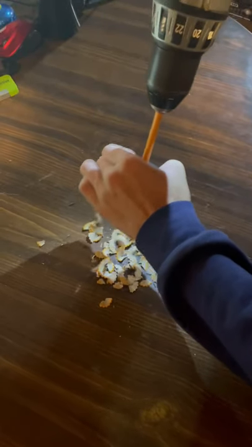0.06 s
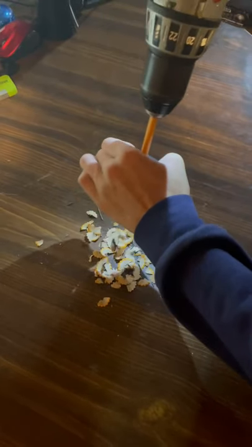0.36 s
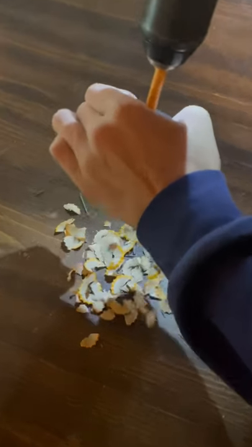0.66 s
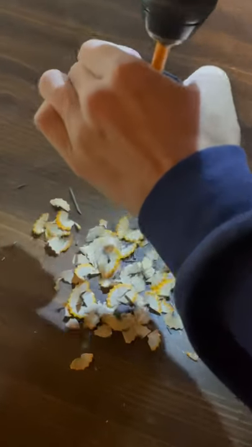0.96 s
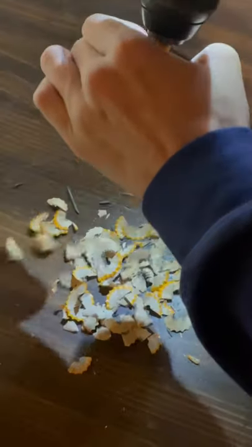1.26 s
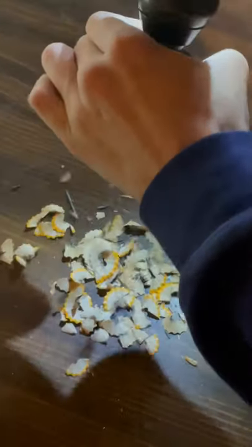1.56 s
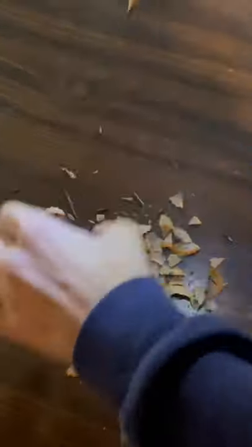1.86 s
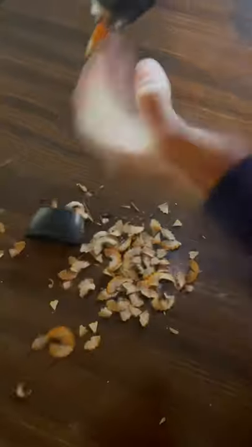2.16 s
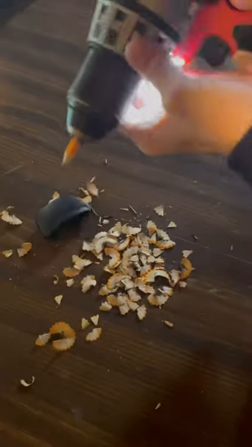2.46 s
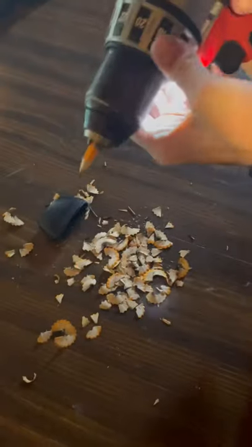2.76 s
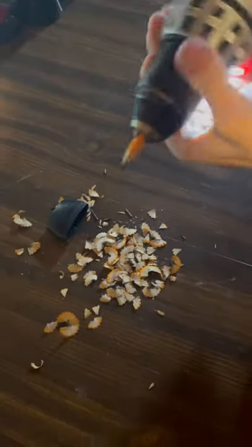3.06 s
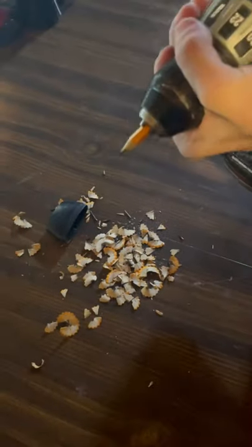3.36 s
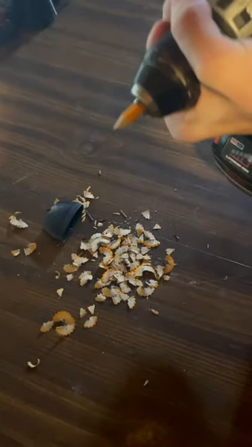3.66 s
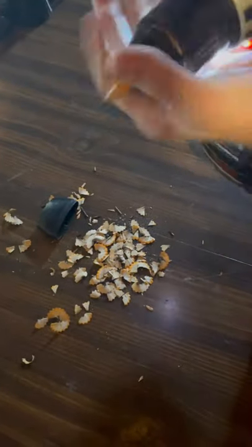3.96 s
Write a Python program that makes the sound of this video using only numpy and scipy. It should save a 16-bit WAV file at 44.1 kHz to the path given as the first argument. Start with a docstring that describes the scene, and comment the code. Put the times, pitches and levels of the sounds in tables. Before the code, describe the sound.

A cordless drill grinds a pencil in a sharpener, which then clatters onto a wooden table.

```python
"""A cordless drill whines close by, spinning a pencil in a hand-held sharpener over a wooden table.
The blade rasps, chatters and cracks through the wood. The drill stops, and the plastic sharpener
clatters down, each bounce a tap and a short ring. The drill clacks as it is handled, then two blips
of the trigger spin it freely. A low room hum lies under it all, and a deep rumble swells at the end."""
import sys
import numpy as np
from scipy import signal
from scipy.fft import rfft, irfft, next_fast_len
from scipy.io import wavfile
from scipy.ndimage import uniform_filter1d

SR = 44100
rng = np.random.default_rng(int(sys.argv[2]) if len(sys.argv) > 2 else 0)


def master(y):
    """Save y as 16-bit WAV."""
    cut = np.clip(np.atleast_2d(y).T, -1, 1)
    pcm = np.round(cut * 32767)  # scale
    wavfile.write(sys.argv[1], SR, pcm.astype(np.int16))


N = 176400
TIME = np.arange(N) / SR
BINS = np.fft.rfftfreq(N, 1 / SR)

# trigger pulls (press [s], release [s], spin-up [s], coast [s], top motor speed [Hz], drive [dB])
TRIGGER_PULLS = [(-.5, 1.48, .1, .1, 304.5, 0), (3.278, 3.386, .09, 0.092, 332.7, -4.5),
                 (3.518, 3.6267, .115, .13, 313.3, -1.5)]
# motor and gear tones (multiple of motor speed, level under load [dB], level spinning free [dB])
MOTOR_TONES = [(1, -44, -62), (2, -58, -72), (3, -62, -70), (4, -54, -45), (5, -62, -52), (6, -55, -60),
               (6.88, -51, -60), (8, -60, -48), (9.48, -44.5, -54), (10, -40, -44), (11, -48, -54),
               (12, -47.5, -39), (15, -39, -37), (16, -52, -35.5), (16.58, -47, -46), (18, -44.5, -45),
               (18.98, -44.5, -45), (19.95, -48, -42), (21, -47, -47)]
# rattle of brushes and gears (frequency [Hz], gain [dB])
RATTLE_EQ = [(100, -28.5), (250, -18.5), (600, -8), (1000, -11.5), (1300, -4), (1950, -8), (2350, 2),
             (3000, -0.5), (3700, 3.5), (4200, 2.5), (4900, 5), (6300, 3), (8000, -5), (10700, 0.5),
             (13000, -12), (15500, -15), (16500, -36.5)]

# pressure of the pencil on the blade (time [s], relative level [dB])
BLADE_PRESSURE = [(0, -13), (.35, -10), (.54, -2), (.8, -3), (.97, 0), (1.2, 0), (1.34, 1), (1.45, -4),
                  (1.5, -4.5), (1.56, -26.5), (1.65, -75)]
# rasp of the blade (frequency [Hz], gain [dB])
RASP_EQ = [(150, -25), (400, -10), (1000, -10), (1600, -7.5), (2000, 1), (2400, -12.5), (3000, -3),
           (3350, -4), (3700, 4), (4300, -2), (4800, 1.5), (5600, 0), (7000, -2.5), (10000, -11),
           (15500, -17.5), (16500, -37.5)]
# low grind of the blade (time [s], level [dB])
GRIND_FADER = [(.45, -43.5), (.56, -39.5), (.85, -39.5), (1.05, -39.5), (1.35, -39), (1.5, -41.5),
               (1.56, -86)]
# shrill chatter as the blade bites deep (time [s], level [dB])
CHATTER_FADER = [(.45, -54.5), (.6, -37), (.88, -40), (.96, -33.5), (1.05, -37), (1.35, -36.5),
                 (1.48, -44.5), (1.56, -87)]
# pencil rubbing in the cone (time [s], level [dB])
RUB_FADER = [(0, -27.5), (.4, -29.5), (.7, -31.5), (1.15, -32.5), (1.42, -33.5), (1.5, -31.5), (1.6, -71),
             (1.65, -104)]
# hiss of that rubbing (frequency [Hz], gain [dB])
RUB_EQ = [(200, -13.5), (700, -6), (1800, -6), (4000, -11), (5500, 3.5), (7000, 1.5), (8500, -4.5),
          (10500, -0.5), (13000, -4), (15500, -10.5), (16300, -40.5)]
# pencil cracking (time [s], level [dB], tilt [dB/octave], contact decay [s], focus [Hz])
PENCIL_CRACKS = [(.4065, -23, 0, .0012, 4000), (.458, -26, 1, .001, 10000), (.511, -27, 0, .0006, 6000),
                 (.557, -25, 0, .0012, 2100), (.597, -24, 1, .001, 9000), (.878, -24, 1, .002, 10000),
                 (1.034, -25, 1, .0015, 11000), (1.164, -24, 1, .001, 10000), (1.276, -25, 1, .0015, 10000),
                 (1.2858, -22, 0, .0012, 5000), (1.3172, -16.5, 0, .0013, 3000)]
# snap of the wood (frequency [Hz], gain [dB])
CRACK_EQ = [(300, -25), (1500, -11.5), (2000, 5.5), (3000, -5.5), (7000, 6), (11000, 5.5), (15500, -10.5),
            (16500, -27.5)]

# sharpener bouncing on the table
# (time [s], relative level [dB], tilt [dB/octave], contact decay [s], focus [Hz], landing [0 flat, 1 edge])
SHARPENER_BOUNCES = [(1.946, -52, 3, 0.0044, 4500, 0.29), (1.954, -23.5, 1, 0.0044, 4540, 0.7),
                     (1.959, -23.5, -3.5, 0.0012, 1300, 1), (2.014, -28, -3, 0.0045, 2800, 0.14),
                     (2.059, -20, -1.5, 0.0059, 2870, 0.37), (2.095, -21, 3.5, 0.0019, 4700, 0),
                     (2.139, -19, 2, 0.0013, 3630, 0.42), (2.1507, -19.5, -0.5, 0.0013, 2570, .5),
                     (2.154, -20.5, 1, 0.0018, 1330, 0.4), (2.1822, -23, 1.5, 0.0023, 5770, .7),
                     (2.2144, -24, 0.5, 0.00087, 3530, 0.45), (2.237, -30, -3, 0.0051, 3500, .5),
                     (2.253, -33.5, -4, 0.0039, 3500, 0.57), (2.261, -31.5, -4.5, 0.0046, 5560, 1),
                     (2.285, -31, 3.5, 0.0014, 1870, 1)]
# ring of sharpener and table
# (frequency [Hz], relative level [dB], t60 [s], edge-landing gain [dB], left lead [turns])
SHELL_MODES = [(379, -10, .07, 5, 0), (629.54, -11.5, 0.24, -4, 0.17), (876, -2, 0.15, -1.5, 0.074),
               (1040, -1.5, 0.13, -7, 0.13), (1143, -5.5, 0.072, 8.5, 0.16), (1299, -1.5, 0.17, -16, .15),
               (1844, -6, 0.1, 17, 0.066), (2160, -7, 0.041, 2, 0.14), (2440, -18, 0.13, 4, 0),
               (2740, 0, 0.061, -19, 0.075), (3550, -3, 0.019, -5.5, 0.038), (4580, -10, 0.065, 6, 0),
               (5690, -10, 0.04, 7, 0.065), (6500, -1, 0.029, -1, 0), (6900, -22, 0.034, -3, 0),
               (9650, -8.5, 0.018, 1, 0)]
# tap on the table top (frequency [Hz], gain [dB])
TAP_EQ = [(40, -57), (150, -2), (400, -8), (1100, 1), (2400, -3.5), (3500, -4), (4200, -10), (6000, -6),
          (7200, -13.5), (9000, -2.5), (12000, -27), (15500, -16.5), (16500, -35.5)]

# switch, trigger and gearbox
# (time [s], relative level [dB], tilt [dB/octave], contact decay [s], focus [Hz])
DRILL_CLACKS = [(1.6205, -50, 3.5, .002, 4770), (2.455, -43.5, -1, 0.0048, 4170),
                (2.573, -50, -1, 0.0028, 3320), (2.6845, -25, 1, 0.0041, 4800),
                (2.687, -30, -1.5, 0.0067, 393), (3.246, -47, -8, 0.0025, 4530),
                (3.2605, -45.5, 5.5, 0.0029, 4770), (3.292, -47.5, 4, .003, 4700),
                (3.3503, -16, 2.5, 0.0044, 2940), (3.355, -27, -10.5, 0.0028, 650),
                (3.922, -48.5, -4.5, 0.0037, 2100), (3.95, -46, -6.5, 0.0096, 2295),
                (3.975, -49, 10, 0.013, 4600)]
# the drill's plastic housing (frequency [Hz], gain [dB])
HOUSING_EQ = [(40, -31), (120, -21), (400, 4), (800, -19), (1150, -1), (1750, -4.5), (2400, -0.5),
              (3000, -3), (4500, -4.5), (6000, -10), (7500, -9.5), (10000, -11.5), (13000, -24),
              (15500, -15), (16500, -22)]
# light metal pings in the mechanism (time [s], relative level [dB])
METAL_PINGS = [(3.27, -45), (3.292, -43)]
# where the drill sits as it is moved (time [s], left minus right [dB])
DRILL_POSITION = [(1.6, 0), (2.5, .3), (3.3, 2), (3.7, 1.5)]

# noise bed of the room (frequency [Hz], gain [dB])
BED_EQ = [(20, -40.5), (32, -28.5), (45, -12), (68, -2), (88, -4), (112, -6), (140, 2), (185, -12),
          (260, -14.5), (400, -21), (700, -26.5), (1000, -31), (1700, -38), (2300, -41.5), (3000, -45),
          (5000, -51), (7500, -58), (14000, -61.5), (16500, -61)]
# how mono that bed is (frequency [Hz], left-right correlation [0 to 1])
BED_CORRELATION = [(100, 0.96), (250, 0.95), (450, 0.82), (700, 0), (1500, 0), (3000, 0.94), (6000, 0.938)]
# steady tones of the room (frequency [Hz], level [dB])
HUM_TONES = [(70, -51.5), (138, -47), (612, -70.5), (788, -65), (2190, -74), (2400, -80.5), (3790, -83)]
# deepest rumble (time [s], level [dB])
RUMBLE_FADER = [(0, -60.5), (1.5, -56), (3.7, -54), (3.87, -43), (4, -42.5)]
# reverb time (frequency [Hz], t60 [s])
REVERB_T60 = [(200, 0.77), (1000, 0.21), (4000, 0.23), (9000, 0.18), (15000, 0.05)]
# stereo width of the reverb (frequency [Hz], side gain [dB])
REVERB_WIDTH = [(150, -16.5), (320, -9), (600, 11.5), (1100, 8), (2300, -3), (5000, -26.5), (15000, -25.5)]
# phase between the microphone ports (frequency [Hz], left lead [turns])
MIC_PHASE = [(0, 0), (5500, 0), (6300, -.04), (6900, -.12), (7550, -.35), (8200, -.5), (9000, -.58),
             (9650, -.7), (10350, -.89), (11200, -1), (12400, -1.04), (13100, -1.17), (13800, -1.42),
             (14800, -1.5)]
# balance between the ports (frequency [Hz], left minus right [dB])
MIC_BALANCE = [(100, -.8), (300, -.8), (650, 2.5), (1500, 1.4), (3000, .6), (5000, .9), (9000, 0)]


def motor():
    """Each trigger pull winds the motor up and lets it run down; gives drive gain and shaft angle."""
    speed_hz, drive = np.zeros(N), np.zeros(N)
    for press, release, rise, coast, top_hz, db in TRIGGER_PULLS:
        spin_up = 1 - (1 - np.clip((TIME - press) / rise, 0, 1)) ** 1.7
        run_down = 1 - np.clip((TIME - release) / coast, 0, 1) ** 2.1
        throttle = spin_up * run_down
        speed_hz += top_hz * throttle ** .6
        drive += amp(db) * throttle ** 3.07
    speed_hz *= 1 + .002 * wander(24.3)  # slight pitch waver
    return drive, 2 * np.pi * np.cumsum(speed_hz) / SR


def drill(drive, angle):
    """Motor and gear tones track the shaft and smear when the gears run slack; gives whine, rattle gain."""
    free = TIME > BLADE_PRESSURE[-1][0]  # the pencil is off the blade
    jitter_rad = np.where(free, .062, .025)
    tones = np.zeros(N)
    for order, load_db, free_db in MOTOR_TONES:
        phase = order * angle + 2 * np.pi * rng.random() + jitter_rad * order * wander(45)
        flutter = 1 + .35 * min(order / 10, 1) * wander(27)
        tones += amp(np.where(free, free_db, load_db)) * flutter * np.sqrt(2) * np.sin(phase)
    # the gears mesh roughly under load; slack, their rattle flickers
    mesh = ~free * amp(-40.5) * wander(130) * np.sin(9.9 * angle)
    mesh *= 1 + .25 * wander(6.3)
    rattle_db = np.where(free, 2.6 * wander(130), -2.5)
    return drive ** 1.15 * (tones + mesh), drive * amp(rattle_db)


def gear_rattle(gain, angle):
    """Brushes and gears rattle, pulsed by each turn of the motor."""
    pulsed = rng.standard_normal(N) * (1 + .21 * np.cos(angle))
    return gain * amp(-27.5) * unit(colour(pulsed, RATTLE_EQ))


def blade_rasp(angle, chips_per_s=3200, gear_ratio=3.2):
    """Wood fibres snap in a dense stream that swells with each turn of the pencil."""
    chips = rng.standard_normal(N) * (rng.random(N) < chips_per_s / SR)
    chips *= amp(-2 * np.minimum(rng.exponential(1, N), 3))  # uneven chip sizes
    bite_db = fader(BLADE_PRESSURE) - 4 * np.sin(angle / gear_ratio) + 2.2 * wander(60)
    return amp(bite_db - 29.5) * unit(colour(chips, RASP_EQ))


def sharpening(angle):
    """The blade grinds, chatters and rasps through the wood while the pencil rubs in the cone."""
    grind = noise_band(GRIND_FADER, centre_hz=1956, half_width_hz=170)
    rub = amp(fader(RUB_FADER)) * unit(colour(rng.standard_normal(N), RUB_EQ))
    chatter = noise_band(CHATTER_FADER, centre_hz=4710, half_width_hz=200)
    return grind + chatter + rub + blade_rasp(angle)


def sharpener_drop():
    """Each bounce taps the wood and rings the shell; flat and edge landings favour different modes."""
    taps = knocks([row[:-1] for row in SHARPENER_BOUNCES], TAP_EQ)
    pair = np.tile(taps, (2, 1))
    t = np.arange(SR // 3) / SR
    hz, mode_db, t60, edge_db, lead = np.transpose(SHELL_MODES)[:, :, None]
    for start, db, tilt, _, focus_hz, edge in SHARPENER_BOUNCES:
        scatter, detune, polarity = rng.standard_normal((3,) + hz.shape)
        strike_db = mode_db + edge * edge_db + 2 * scatter + voicing(hz, tilt, focus_hz)
        envelopes = np.sign(polarity) * amp(strike_db - 60 * t / t60) / np.sqrt(t60)
        turns = hz * (1 + .008 * detune) * t
        for channel, side in zip(pair, (.5, -.5)):
            ring = (envelopes * np.sin(2 * np.pi * (turns + side * lead))).sum(0)
            add(channel, start, 15 * amp(db - .5) * ring / np.linalg.norm(ring))
    return pair


def handling(ping_hz=4500, ping_t60_s=.049):
    """Clacks in the drill's housing and the odd ping of a small metal part."""
    mix = knocks(DRILL_CLACKS, HOUSING_EQ)
    t = np.arange(SR // 5) / SR
    for start, db in METAL_PINGS:
        add(mix, start, amp(db - 60 * t / ping_t60_s) * np.sin(2 * np.pi * ping_hz * t))
    return mix


def knocks(hits, body_eq, size=16384, attack_s=.0011):
    """Two surfaces chatter briefly at each hit: a noise burst coloured by the struck body."""
    mix, t = np.zeros(N), np.arange(size) / SR
    for start, db, tilt, decay, focus_hz in hits:
        envelope = np.exp(-t / decay) * np.minimum(t / attack_s, 1)
        burst = rfft(rng.standard_normal(size) * envelope)
        burst /= np.sqrt(uniform_filter1d(abs(burst) ** 2, size=400))  # flatten, so the EQ sets the tone
        hit = colour(irfft(burst), body_eq, lambda hz: voicing(hz, tilt, focus_hz))[:size // 2]
        hit *= np.sqrt(.005 * SR) / np.linalg.norm(hit)  # the energy of 5 ms at rms 1
        add(mix, start, amp(db) * hit)
    return mix


def voicing(hz, tilt, focus_hz, bell_db=7, bell_octaves=.312):
    """The point of contact tilts the spectrum and lifts one band; gain in dB."""
    octaves_off = np.log2((hz + 1) / focus_hz)
    return tilt * np.log2((hz + 300) / 3300) + bell_db * np.exp(-(octaves_off / bell_octaves) ** 2)


def table_scatter(pair, side_db=-20, decay_s=.0014, cutoff_hz=2000):
    """Early scatter off the table top and hands reaches the two sides differently."""
    t = np.arange(SR // 25) / SR
    taps = rng.standard_normal(len(t)) * np.exp(-t / decay_s) * (t > .0005)
    side = amp(side_db) * signal.fftconvolve(pair.mean(0), taps / np.linalg.norm(taps))[:N]
    side = irfft(rfft(side) / (1 + (BINS / cutoff_hz) ** 2), N)
    return pair + np.array([side, -side])


def reverb(x, wet_db):
    """Direct sound plus a short tail of sparse reflections, partly different on each side."""
    size = SR // 2
    taps = rng.choice([-1., 1.], (2, size)) * (rng.random((2, size)) < .12)
    taps *= np.arange(size) > 110  # 2.5 ms pre-delay
    hz, t, frames = signal.stft(taps, SR, nperseg=256)
    tail = signal.istft(frames * amp(-60 * t / curve(REVERB_T60, hz)[:, None]), SR, nperseg=256)[1]
    send = np.atleast_2d(x).mean(0)[None]
    mid, side = signal.fftconvolve(send, tail / np.linalg.norm(tail[0]), axes=1)[:, :N]
    side = irfft(rfft(side) * amp(curve(REVERB_WIDTH, BINS)), N)
    return x + amp(wet_db) * np.array([mid + side, mid - side])


def room_tone(bed_db=-43.5):
    """Low hum and faint hiss of the room, near mono in the bass."""
    left, independent = rfft(rng.standard_normal((2, N)))
    correlation = curve(BED_CORRELATION, BINS)
    right = correlation * left + np.sqrt(1 - correlation ** 2) * independent
    bed = amp(bed_db) * unit(irfft(np.array([left, right]) * amp(curve(BED_EQ, BINS)), N))
    for hz, db in HUM_TONES:
        flutter = 1 + .3 * wander(5.4)
        bed += amp(db) * flutter * np.sin(2 * np.pi * hz * TIME + .8 * wander(11))
    return bed


def rumble():
    """A deep rumble that swells at the end."""
    return noise_band(RUMBLE_FADER, centre_hz=63, half_width_hz=20)


def noise_band(levels, centre_hz, half_width_hz):
    """Narrow, pitched noise riding a fader."""
    return amp(fader(levels)) * wander(half_width_hz) * np.sqrt(2) * np.sin(2 * np.pi * centre_hz * TIME)


def wander(rate_hz):
    """Random motion of rms 1, rolled off above the given rate."""
    return unit(irfft(rfft(rng.standard_normal(N)) / (1 + (BINS / rate_hz) ** 4), N))


def colour(x, eq, extra_db=lambda hz: 0):
    """Minimum-phase EQ, which keeps attacks sharp."""
    size = next_fast_len(len(x) + 4096)
    hz = abs(np.fft.fftfreq(size, 1 / SR))
    log_gain = np.log(amp(curve(eq, hz) + extra_db(hz)))
    return np.fft.ifft(np.fft.fft(x, size) * np.exp(signal.hilbert(log_gain))).real[:len(x)]


def fader(points):
    """Reads a table along the timeline."""
    return np.interp(TIME, *np.transpose(points))


def curve(points, hz):
    """Reads a table on a log-frequency axis."""
    point_hz, value = np.transpose(points)
    return np.interp(np.log(hz + 1), np.log(point_hz + 1), value)


def add(mix, start_s, sound):
    """Mixes a sound in at its cue."""
    part = mix[round(start_s * SR):][:len(sound)]
    part += sound[:len(part)]


def amp(db):
    """Decibels to gain."""
    return 10 ** (np.asarray(db) / 20)


def unit(x):
    """Scales to rms 1."""
    return x / np.sqrt(np.mean(x ** 2) + 1e-20)


def scene():
    """Drill, blade and knocks up front in a small room, over hum and rumble."""
    drive, angle = motor()
    whine, rattle_gain = drill(drive, angle)
    sides = np.array([[1], [-1]])
    # a separate layer of grit, in opposite polarity left and right, widens the image
    wide_grit = amp(-11.5) * (gear_rattle(rattle_gain, angle) + sharpening(angle)) * sides
    centre_grit = gear_rattle(rattle_gain, angle) + sharpening(angle)
    cracks = knocks(PENCIL_CRACKS, CRACK_EQ)
    work = reverb(whine + centre_grit + cracks, wet_db=-14.5) + wide_grit
    clacks = reverb(amp(-2) * handling(), wet_db=-17)
    tool = (work + clacks) * amp(sides * fader(DRILL_POSITION) / 2)
    clatter = reverb(amp(-5.5) * sharpener_drop(), wet_db=-13.5)
    return table_scatter(tool + clatter) + room_tone() + rumble()


def record(dry):
    """Two microphone ports, slightly off balance and out of step in the treble; then a 16.1 kHz high cut."""
    hz = np.fft.rfftfreq(2 * N, 1 / SR)
    lead_turns = np.interp(hz, *np.transpose(MIC_PHASE))
    left_port = np.exp(1j * np.pi * lead_turns) * amp(curve(MIC_BALANCE, hz) / 2)
    pair = irfft(rfft(dry, 2 * N) * np.array([left_port, 1 / left_port]))[:, :N]
    high_cut = signal.firwin(511, 16100, window=("kaiser", 9), fs=SR)
    return signal.oaconvolve(pair, high_cut[None], "same")


dry = scene()
out = record(dry)
master(out)
```